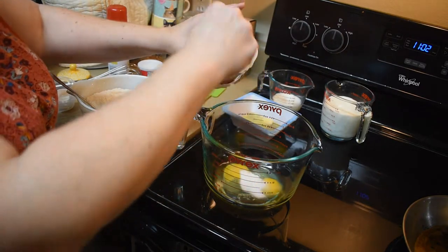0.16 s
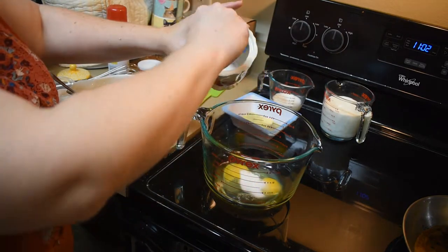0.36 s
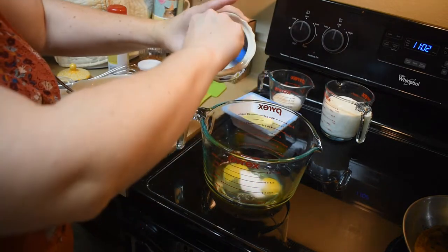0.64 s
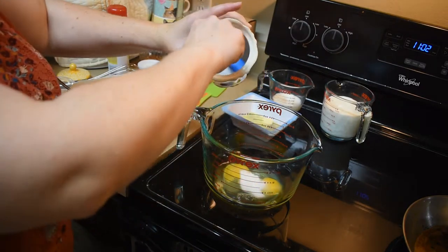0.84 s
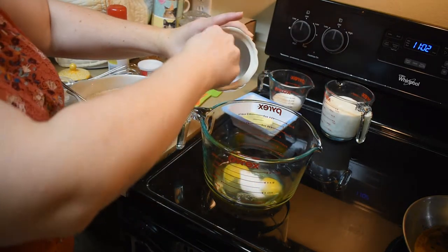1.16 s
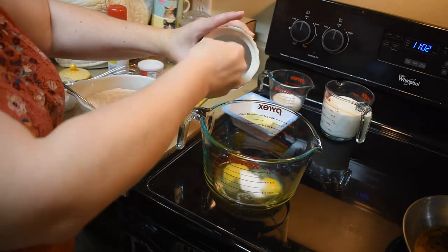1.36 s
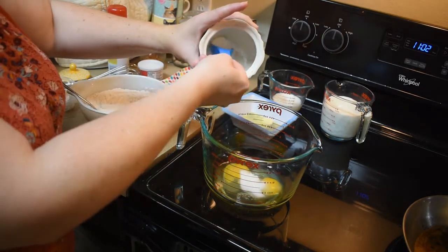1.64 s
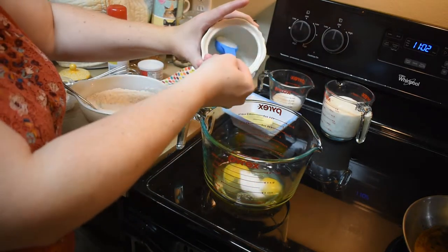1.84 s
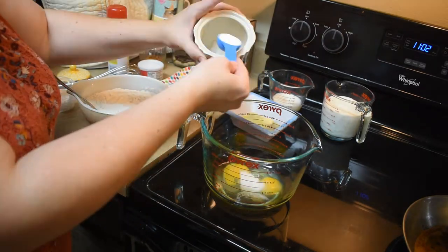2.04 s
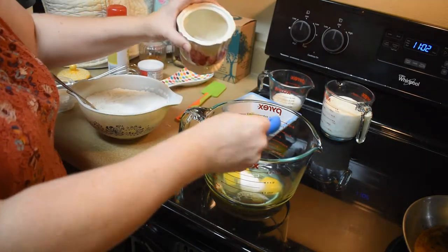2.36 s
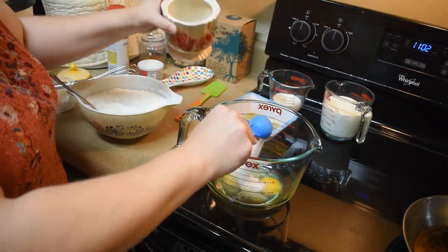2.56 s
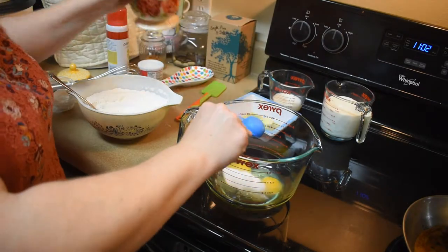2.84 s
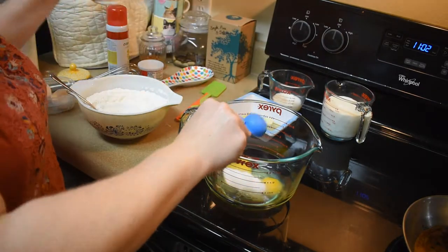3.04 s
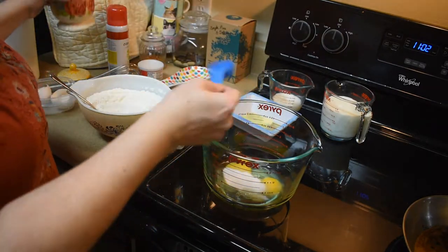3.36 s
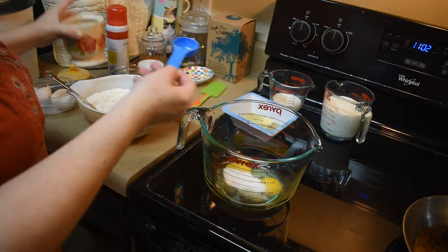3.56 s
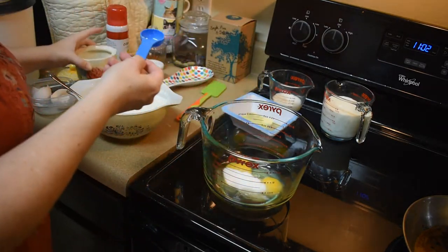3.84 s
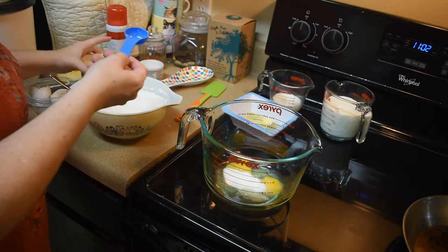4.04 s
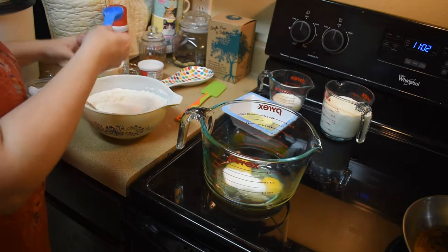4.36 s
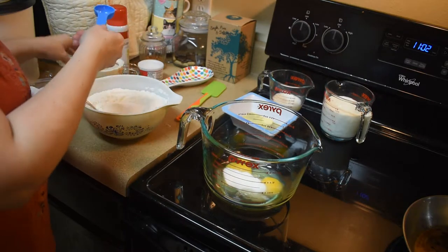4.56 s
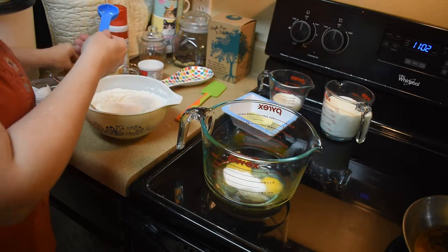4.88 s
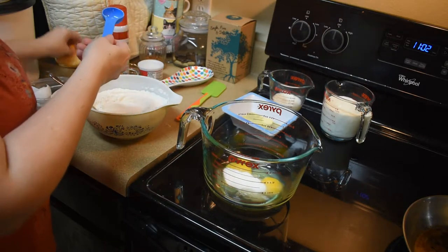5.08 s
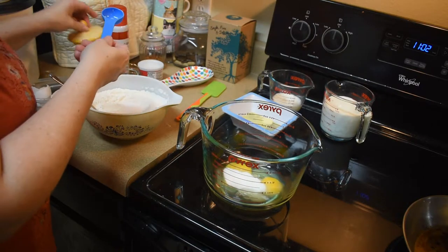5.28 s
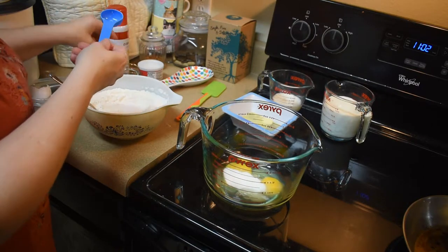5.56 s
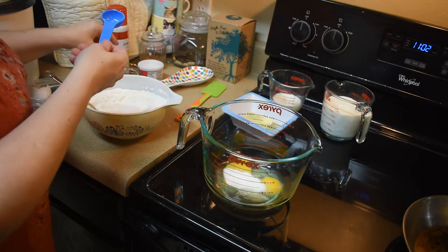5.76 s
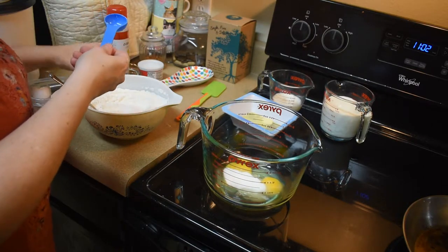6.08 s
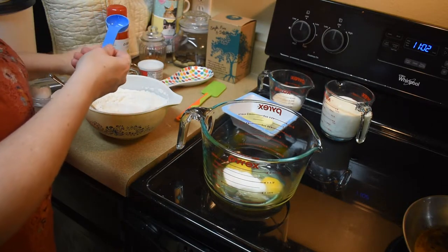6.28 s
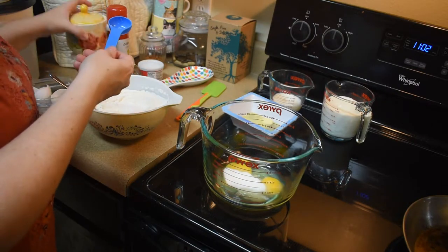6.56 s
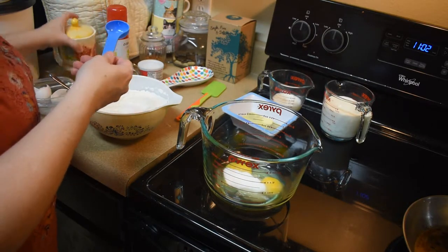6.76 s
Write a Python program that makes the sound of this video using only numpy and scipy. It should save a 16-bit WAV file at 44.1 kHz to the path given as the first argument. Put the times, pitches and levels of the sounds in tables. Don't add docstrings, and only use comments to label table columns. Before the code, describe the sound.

Over a low refrigerator hum, a gritty scoop of crackling sugar rings a small ceramic jar, followed by a counter knock and soft lid clinks.

```python
import sys
import numpy as np
from scipy import signal
from scipy.fft import rfft, irfft, next_fast_len
from scipy.io import wavfile
from scipy.ndimage import uniform_filter1d

SR = 44100
rng = np.random.default_rng(int(sys.argv[2]) if len(sys.argv) > 2 else 0)


def generate_wav(signal):
    frames = np.transpose(np.atleast_2d(signal))
    scaled = np.clip(frames, -1, 1) * 32767
    pcm = np.round(scaled).astype(np.int16)
    wavfile.write(sys.argv[1], SR, pcm)


def nominal_scale(level):
    x = np.asarray(level, float) / 20
    return 10 ** x


N = 305172

# t/s, grind level/dB
FEELING_ABOUT = [
    (.36, -63),
    (.42, -52),
    (.53, -75),
    (.64, -60),
    (.74, -69),
    (.82, -50.5),
    (.9, -60),
    (.99, -42),
]
DEEP_SCOOP = [
    (1.048, -36),
    (1.058, -27.5),
    (1.115, -36.5),
    (1.15, -23),
    (1.2, -37.5),
    (1.245, -25.5),
    (1.275, -31.5),
    (1.35, -31.5),
    (1.435, -46),
]
DRAG_UP = [
    (1.49, -45.5),
    (1.545, -37),
    (1.62, -70),
    (1.72, -56),
    (1.9, -70),
]

# t/s, peak level/dB, drive of the lower wall/dB, favoured f/Hz
SPOON_TAPS = [(0.3639, -30.5, 7.5, 3600), (0.4075, -40, -5, 5800), (0.4634, -49, 9, 3850),
              (0.532, -42, 8, 6660), (0.5437, -35.5, 2.5, 4460), (0.616, -40, 1, 4460),
              (0.635, -42, 5, 6620), (0.6448, -36, 4, 5360), (0.656, -44.5, 10, 4630),
              (0.6764, -39, 5.5, 5450), (0.695, -45, 6, 5800), (0.7761, -37, 6, 4400),
              (0.784, -30, -3.5, 5500), (0.8124, -33, -3, 6300), (0.873, -40, 2, 5800)]
CRYSTAL_CRACKS = [(0.9961, -4, -9.5, 6700), (1.0024, -7.5, -5.5, 6240), (1.0306, -9.5, -5, 6450),
                  (1.0424, -9, -7, 6590), (1.0525, -9.5, 1, 6540), (1.0574, -21, -4, 5440),
                  (1.0684, -14, -1, 4950), (1.0774, -9, -2, 5500), (1.0854, -9, -3.5, 5060),
                  (1.0964, -15, -8, 4960), (1.1094, -10, -15, 6410), (1.1248, -25, -5, 6900),
                  (1.1248, -1, -9, 5100), (1.1304, -18, -15, 5080), (1.1364, -14, -2, 5760),
                  (1.1404, -14, -9, 6430), (1.1444, -16, 3, 4880), (1.1574, -7.5, -8, 4970),
                  (1.1618, -4, -9, 5070), (1.1664, -13, -7, 6390), (1.1744, -23, -7, 6440),
                  (1.1854, -23, -7, 4900), (1.2092, -9, -6, 5260), (1.2144, -9.5, 2, 6190),
                  (1.2184, -11, 1, 4990), (1.2284, -4, -10, 4920), (1.2374, -9.5, -13, 4900),
                  (1.2444, -13, -10, 6610), (1.2574, -21, -14, 4830), (1.2624, -9, -6, 4910),
                  (1.2684, -14, -5, 5140), (1.281, -3.5, -5.5, 4940), (1.2925, -7, -0.5, 5300),
                  (1.3044, -8, -1, 6260), (1.3129, -1.5, -15, 5310), (1.3164, -2.5, -11, 6710),
                  (1.3204, -4, -3, 6270), (1.3264, -8, -1, 6460), (1.3384, -12.5, -3, 5200),
                  (1.3424, -5, -0.5, 5050), (1.3484, -22, -7, 5560), (1.3554, -15, -1, 5270),
                  (1.3654, -17, 2, 6310), (1.3813, -7.5, -18, 4900)]
SPOON_KNOCKS = [(0.9174, -13.5, -11, 5600), (0.9371, -25, 1.5, 6230), (0.966, -28.5, 10, 6620),
                (1.4456, -12, -4.5, 5200), (1.4505, -19, 0, 5600), (1.4706, -14.5, -13, 4840),
                (1.476, -18, -5, 5000), (1.483, -23, -1, 4900), (1.5015, -26, -8, 4960),
                (1.5194, -15, -11, 6120), (1.5309, -11.5, -7, 5200), (1.537, -13, -4, 5300),
                (1.543, -19, -6, 6200), (1.5564, -21, -22, 6500), (1.565, -15, -6, 6300),
                (1.5713, -12, -19, 6350), (1.5853, -5.5, -8.5, 4930), (1.595, -28, -10, 5100),
                (1.6104, -17, -8, 5960), (1.63, -23, -8, 6300), (1.644, -24, -2.5, 6000),
                (1.6576, -19.5, -5, 5800), (1.672, -21.5, -8, 5460), (1.686, -28, -5, 6200),
                (1.7384, -16.5, -4.5, 4900), (1.8008, -17, -5, 4970)]
# t60/s, level/dB, favoured lower-wall f/Hz, extra brightness/dB
CRYSTAL_SPILLS = [
    (0.062, -29, 2500, 15.5),
    (0.036, -28.5, 3400, -5.5),
    (0.059, -28.5, 7400, -1),
]
# t/s, level/dB, favoured f/Hz
AIR_SHOVES = [(.362, -30, 740), (.385, -53, 740), (0.969, -32, 810), (1.031, -34, 818), (1.058, -28, 820),
              (1.076, -40, 820), (1.139, -53, 990), (1.166, -26, 830), (1.186, -41, 820), (1.214, -31, 810),
              (1.249, -25, 829), (1.262, -52, 986), (1.303, -27, 1010), (1.339, -48, 821),
              (1.361, -32, 826), (1.456, -45, 840), (1.532, -30, 820)]

# f/Hz, width/Hz, level/dB
UPPER_WALL = [(3950, 570, -2), (4160, 490, -2), (4630, 270, -7.5), (5060, 350, 5.5), (5300, 240, -0.5),
              (5970, 390, -5), (6070, 560, -2.5), (6290, 240, 4.5), (6680, 420, 2)]
LOWER_WALL = [(1120, 25, -10.5), (1332, 80, -6), (1700, 150, -9), (1770, 78, -10), (1998, 43, -2),
              (2035, 60, -8.5), (2194, 67, -2), (2350, 280, -12), (2830, 390, 1.5), (3000, 190, -13),
              (3120, 180, -6), (3500, 300, -3)]
JAR_AIR = [(600, 34, -19.5), (700, 54, -11), (802, 22, -2.5), (829, 30, 0.5), (986, 34, -3)]
# f/Hz, level/dB
GRIT_COLOUR = [(500, -52), (2500, -11), (4200, -7), (5000, 12), (6600, -6), (7400, -28), (10000, -45)]
FIZZ_COLOUR = [(5000, -39), (7000, -6.5), (8200, -6), (9700, -3.5), (11500, -8.5), (13000, -11.5),
               (15500, -26), (17000, -11)]

# t/s, level/dB, lowest f/Hz, highest f/Hz, t60/s
CONTACT_TICKS = [(0.128, -55.5, 1800, 2600, 0.16), (.13, -64, 6000, 7200, .2), (2.82, -68, 4500, 7000, 0.092),
                 (3.854, -59, 5000, 7100, .1), (3.909, -54, 4500, 6800, 0.1), (3.912, -72, 8000, 12000, .1),
                 (3.926, -64, 2500, 6500, 0.11), (4.011, -44, 1080, 6300, 0.19),
                 (4.013, -74, 7000, 13000, .15), (4.185, -37, 910, 2570, 0.069),
                 (4.186, -48.5, 2500, 5500, .08), (4.2, -40, 800, 1500, .15), (3.912, -53, 1200, 2800, .1),
                 (4.186, -65, 5500, 11500, 0.1), (4.261, -50, 2500, 7500, 0.087),
                 (4.288, -61, 6500, 8800, .08), (.363, -29.5, 2180, 4700, 0.041), (3.3, -61, 1500, 4000, 1),
                 (5.759, -51, 1200, 6500, 0.15), (5.842, -43.5, 990, 2650, 0.21),
                      (5.845, -53.5, 3000, 6170, 0.39), (6.222, -45.5, 2000, 6350, 0.24),
                      (6.225, -56, 6500, 12800, .08), (6.419, -48, 2530, 6900, 0.13),
                      (6.418, -53, 7000, 15000, .08), (6.423, -42, 1000, 3200, 0.16),
                      (6.454, -54, 2520, 7000, 0.088), (6.588, -50.5, 1500, 6660, 0.25),
                      (6.591, -43.5, 885, 1480, 0.17), (6.693, -53, 910, 1160, 0.33),
                      (6.801, -52, 1310, 1700, 0.14), (6.845, -58, 1980, 3500, 0.11)]
# t/s, peak level/dB, t60 factor, boom level/dB, favoured f/Hz
COUNTER_BLOWS = [(4.183, -13, 0.72, 0.5, 700), (4.187, -15, 0.8, -12, 640), (4.192, -15, 0.57, -20, 920),
                 (4.196, -13.5, 0.3, -20, 645), (4.203, -16.5, .6, -19, 840), (4.217, -28, 0.65, -6, 650),
                 (4.236, -33, 0.76, -5, 600), (4.259, -25, 0.57, 2, 500), (5.759, -28.5, 0.79, -3, 420),
                 (5.772, -28, 2, -2, 420), (5.843, -24.5, 1, 1.5, 1290), (5.848, -28, 0.9, -13, 372),
                 (5.861, -26.5, 0.7, -11, 880), (6.269, -35, 0.99, 7, 1150)]
# t/s, peak level/dB
CERAMIC_CLINKS = [(3.908, -45.5), (3.925, -49), (4.011, -41), (4.186, -74), (5.76, -41), (5.777, -43),
                  (6.223, -24), (6.416, -26.5), (6.426, -28), (6.442, -24), (6.456, -36.5), (6.593, -45),
                  (0.363, -40), (5.758, -27.5), (5.771, -25), (6.453, -27.5)]

# f/Hz, level/dB, t60/s
CABINET_BOOM = [(113, -17, 0.26), (134.3, -7, 0.067)]
COUNTER_TOP = [(270, -13, 0.18), (355.8, 7, 0.38), (394, -3, 0.082), (454, -3, 0.13), (502, -2.5, 0.11),
               (576, 5.5, 0.077), (663, 7, 0.11), (800, -1, 0.1), (970, -0.5, 0.05), (1098, 3, 0.07),
               (1340, -1, 0.081), (1580, -1, 0.055), (1770, -2, 0.068), (2130, -2, 0.026)]
SPOON_TOUCH = [(2160, -4, 0.056), (2670, 2, 0.35), (3400, -33, 0.11), (4440, -17, 0.18), (5770, 2, .2)]
HAND_BRUSH = [(5100, -6, .08), (5600, 3, 0.088), (6600, -3, .07), (11100, -14, .08)]
FINGER_GRIP = [(2690, -1, 0.13), (3600, 0, 0.18), (4200, -7, .12), (5950, -1, .06)]
SLIDING_JAR = [(1200, -2, .08), (1800, 4, .08), (2510, -9, .1), (3880, -3, .09), (4630, -9, .12),
               (5840, -2, .1), (6500, -1, .06), (10500, -19, .06)]
FOOT_OF_JAR = [(10600, -1, .12), (11400, -9, .05)]
LIFTED_LID = [(2440, -2, 0.08), (2150, -2, .06), (5800, -4, 0.13), (8860, -11, 0.18), (10000, -20, .15)]
ROCKING_LID = [(2420, -3, 0.11), (5450, 4, 0.1), (6000, -6, .1)]
KNOCKED_LID = [(440, -6, 0.12), (492, 2.5, 0.094), (800, -10.5, .1), (986, -14.5, .1), (1580, -14, 0.035),
               (2080, -22, 0.052)]
TOUCHING_LID = [(1570, -16, 0.13), (2350, 15, 0.028), (2470, -6.5, 0.063), (2460, -12, 0.29),
                (2800, -10, 0.16), (3920, -8, 0.18), (4700, -4, 0.16), (4910, -10, 0.11), (5200, -5, 0.12),
                (5800, -10, 0.15), (5755, 3, 0.092), (7860, -25, .15), (10100, -10, 0.098),
                (11920, -22, .15)]
SEATED_LID = [(2910, -13, 0.29), (4100, -12, 0.18), (4900, -8, 0.15), (5230, 1, 0.064), (5600, 1, 0.057),
              (6170, 6, 0.052), (6546, -5, 0.092), (7154, -22, 0.11), (8280, -12, .05), (10080, -9, 0.07),
              (10400, -13, 0.1), (11040, -7, 0.091), (12960, -24, .06)]
RINGING_JAR = [(680, -5, .08), (713, -3, 0.1), (826, -2, 0.22), (966, 8, 0.13), (1093, -8, 1),
               (1226, -2, 0.066), (1470, -8, 0.15), (1483, -6.5, 0.11), (1690, 3, 0.05), (1771, -8, 0.1),
               (2060, -6.5, .06), (2480, -21, .08)]
BOUNCING_LID = [(2610, -14, .18), (2790, -8, 0.21), (2800, -13, 0.092), (3553, -17, .15), (4250, -2, 0.11),
                (5249, -6, .11), (5730, 7, 0.054), (6300, -12, .1), (7350, -14, .07)]
SETTLING_LID = [(5600, 8, 0.073), (6500, 7, 0.05), (7300, -6, .05), (8800, -4, .05), (9800, -8, .05),
                (11900, -12, .05)]

# f/Hz, t60/s
ROOM_DECAY = [(200, 0.19), (800, 0.41), (3000, 0.36), (8000, 0.28), (15000, 0.044)]
# f/Hz, level/dB
COMPRESSOR = [(296.1, -55), (355.3, -41), (414.5, -51), (624.5, -65), (651.4, -64), (710.6, -60),
              (882.9, -66), (1007, -69), (1184, -65), (1362, -72), (1836, -77), (2842, -78), (2961, -81),
              (3198, -76), (3435, -74), (3494, -77), (3731, -79), (3849, -77), (3908, -78), (4382, -82),
              (5626, -69), (5744, -82), (5803, -67), (5862, -78), (6158, -85), (6928, -86)]
# f/Hz, level per Hz/dB
HISS_COLOUR = [(15, -60), (30, -18), (97, -18.5), (180, -13), (265, -2), (330, -13), (476, -12),
               (1100, -21), (2160, -32.5), (4870, -37), (6200, -36.5), (7400, -48), (11000, -50.5),
               (16000, -60)]


def evened(x):
    return x / np.sqrt(np.mean(x ** 2) + 1e-20)


def read(points, hz):
    f, value = np.transpose(points)
    return np.interp(np.log(hz + 1), np.log(f + 1), value)


def add(mix, s, sound):
    part = mix[round(s * SR):][:len(sound)]
    part += sound[:len(part)]


def colour(points):
    db = read(points, abs(np.fft.fftfreq(4096, 1 / SR)))
    log_gain = np.log(nominal_scale(np.maximum(db, -70)))
    taps = np.fft.ifft(np.exp(np.conj(signal.hilbert(log_gain)))).real[:1024]
    return taps / np.linalg.norm(taps)


def modes(table, stretch=1, spread=0.00045, size=SR // 3):
    hz, db, t60 = np.transpose(table)[:, :, None]
    sign, detune = rng.standard_normal((len(table), 2, 1)).transpose(1, 0, 2)
    turn = 2j * np.pi * hz * (1 + spread * detune)
    fade = np.log(1000) / (t60 * stretch)
    step = np.exp((turn - fade) / SR)
    spirals = np.cumprod(np.repeat(step, size, axis=1), axis=1)
    x = (np.sign(sign) * nominal_scale(db) * spirals).sum(0).imag
    return x / abs(x).max()


def body(peaks, uneven_db=0, centre_hz=None, narrow_db=30):
    hz, width, db = np.transpose(peaks)
    db = db + 10 * np.log10(width) + uneven_db * rng.standard_normal(len(hz))
    if centre_hz is not None:
        db = db - narrow_db * np.log2(hz / centre_hz) ** 2
    x = modes(np.transpose([hz, db, 1.92 / width]), spread=0.0057, size=4000)
    return x / np.linalg.norm(x)


def grit_ring():
    return np.pad(colour(GRIT_COLOUR), (0, 4000 - 1024))


def grinding():
    s, pressure_db = np.transpose(FEELING_ABOUT + DEEP_SCOOP + DRAG_UP)
    t = np.arange(N) / SR
    clumps = evened(uniform_filter1d(rng.standard_normal(N), size=120))
    size_db = 4.1 * np.minimum(rng.exponential(1, N), 4) + 2.4 * np.clip(clumps, -2, 2)
    happens = rng.random(N) < 7000 / SR
    slips = evened(nominal_scale(size_db) * rng.choice([-1, 1], N) * happens)
    slips = slips * (t > s[0]) * (t < s[-1])
    grind_db = np.interp(t, s, pressure_db)
    over_db = grind_db + 30
    upper = slips * nominal_scale(grind_db)
    high = slips * nominal_scale(-37 + 1.0 * over_db)
    air = slips * nominal_scale(-34 + 0.93 * over_db)
    deep = slips * nominal_scale(-29 + 0.92 * over_db)
    out, grit = np.zeros(N), grit_ring()
    place = np.floor(np.cumsum(rng.random(N) < 60 / SR)) % 4
    for k in range(4):
        here = place == k
        wall = 0.84 * body(UPPER_WALL, uneven_db=2.5) + 0.5 * grit
        out += signal.oaconvolve(upper * here, wall)[:N]
        out += signal.oaconvolve(deep * here, body(LOWER_WALL, uneven_db=1.0))[:N]
        out += signal.oaconvolve(air * here, body(JAR_AIR, uneven_db=3.5))[:N]
    return out + signal.oaconvolve(high, colour(FIZZ_COLOUR))[:N]


def snaps():
    out, high, grit = np.zeros(N), np.zeros(N), grit_ring()
    t = np.arange(3000) / SR
    snap_shape = nominal_scale(-60 * t / 0.0083) * np.minimum(t / 0.00081, 1)
    for table, spill in zip((SPOON_TAPS, CRYSTAL_CRACKS, SPOON_KNOCKS), CRYSTAL_SPILLS):
        spill_s, spill_db, deep_hz, bright_db = spill
        for at, db, deep_db, hz in table:
            t60 = spill_s * np.exp(0.12 * rng.standard_normal())
            burst = rng.standard_normal(3000) ** 3 * nominal_scale(spill_db - 60 * t / t60)
            burst += 0.4 * np.sign(rng.standard_normal(3000)) * snap_shape
            burst[20] = 0.31
            burst = burst * nominal_scale(db - 1.5)
            ring = 1.57 * body(UPPER_WALL, 3.2, hz) + 0.059 * grit
            ring += nominal_scale(deep_db + 6.0) * body(LOWER_WALL, 1.5, deep_hz, narrow_db=3.0)
            add(out, at, signal.fftconvolve(burst, ring))
            add(high, at, burst * nominal_scale(-11 + 0.35 * db + bright_db + 9.0))
            air = body(JAR_AIR, uneven_db=-0.5)
            add(out, at, signal.fftconvolve(burst * nominal_scale(deep_db - 2), air))
    return out + signal.oaconvolve(high, colour(FIZZ_COLOUR))[:N]


def shoves():
    out, t = np.zeros(N), np.arange(1500) / SR
    for s, db, centre_hz in AIR_SHOVES:
        push = rng.standard_normal(len(t)) * nominal_scale(db - 60 * t / 0.045)
        air = body(JAR_AIR, 1.5, centre_hz, narrow_db=120)
        add(out, s, signal.fftconvolve(push, air))
    return out


def thuds():
    out, t = np.zeros(N), np.arange(SR // 3) / SR
    for s, db, stretch, boom_db, centre_hz in COUNTER_BLOWS:
        woken = [(hz, level_db - 7 * np.log2(hz / centre_hz) ** 2, t60)
                 for hz, level_db, t60 in COUNTER_TOP]
        knock = modes(5 * woken, stretch, spread=0.032, size=9000)
        knock = knock * np.minimum(t[:9000] / 0.0013, 1)
        boom = modes(CABINET_BOOM, size=len(t)) * np.minimum(t / 0.0063, 1)
        add(out, s, nominal_scale(db) * knock)
        add(out, s, nominal_scale(db + boom_db - 10.5) * boom)
    return out


def clinks():
    out, t = np.zeros(N), np.arange(SR // 3) / SR
    struck = (HAND_BRUSH, FINGER_GRIP, SLIDING_JAR, FOOT_OF_JAR, LIFTED_LID, ROCKING_LID,
              TOUCHING_LID, SEATED_LID, RINGING_JAR, RINGING_JAR, BOUNCING_LID, SETTLING_LID,
              SPOON_TOUCH, KNOCKED_LID, KNOCKED_LID, RINGING_JAR)
    rise = np.minimum(t / 0.0014, 1)
    for (s, db), table in zip(CERAMIC_CLINKS, struck):
        neighbours = [(hz, level_db, t60 * 0.35) for hz, level_db, t60 in table]
        ring = 1.44 * modes(table) + 1.06 * modes(3 * neighbours, spread=0.022)
        add(out, s, nominal_scale(db) * rise * ring)
    return out


def ticks():
    out, t = np.zeros(N), np.arange(SR // 4) / SR
    for s, db, low_hz, high_hz, t60 in CONTACT_TICKS:
        shade = colour([(low_hz / 4, -50), (low_hz / 1.3, -10), (low_hz, 0),
                        (high_hz, -3), (high_hz * 1.1, -13), (high_hz * 3, -50)])
        snap, rustle = nominal_scale(-60 * t / 0.0053), nominal_scale(0.5 - 60 * t / t60)
        puff = rng.standard_normal(len(t)) * (snap + rustle)
        add(out, s, nominal_scale(db) * np.convolve(puff, shade))
    return out


def kitchen(x):
    taps = np.zeros(SR // 2)
    at = np.arange(200, len(taps) - 20, 20)
    taps[at + rng.integers(0, 20, len(at))] = rng.choice([-1., 1.], len(at))
    hz, t, z = signal.stft(taps, SR, nperseg=256)
    fade = nominal_scale(-60 * t / read(ROOM_DECAY, hz)[:, None])
    tail = signal.istft(z * fade, SR, nperseg=256)[1]
    return signal.fftconvolve(x, tail / np.linalg.norm(tail))[:N]


def drift(rate_hz):
    t = np.arange(N // 64 + 1) * 64 / SR
    x = sum(np.sin(2 * np.pi * (f * t + rng.random())) / np.sqrt(f)
            for f in np.geomspace(rate_hz / 20, rate_hz, 12))
    return np.interp(np.arange(N) / SR, t, evened(x))


def fridge():
    turns = np.cumsum(1 + 0.00026 * drift(2.93)) / SR
    starts = np.append([.45, 0, 0], rng.random(len(COMPRESSOR) - 3))
    tone = np.zeros(N)
    for (hz, db), start in zip(COMPRESSOR, starts):
        waver_db = (1.08 + 2.5 * hz / 6000) * drift(8) + 1.5 * hz / 6000 * drift(30)
        tone += np.sqrt(2) * nominal_scale(db + waver_db) * np.sin(2 * np.pi * (hz * turns + start))
    size = next_fast_len(N)
    shade = nominal_scale(read(HISS_COLOUR, np.fft.rfftfreq(size, 1 / SR)))
    hiss = irfft(rfft(rng.standard_normal(size)) * shade, size)[:N]
    return nominal_scale(-0.37) * tone + nominal_scale(-45 + 0.35 * drift(12.0)) * evened(hiss)


def scene():
    no_bass = signal.butter(2, 450, "high", fs=SR, output="sos")
    near = signal.sosfilt(no_bass, grinding() + snaps() + shoves())
    far = ticks() + thuds() + clinks()
    echo = kitchen(nominal_scale(-10.5) * near + nominal_scale(-8.5) * far)
    return (near + far + echo + fridge())[None]


def top_cut(x):
    return signal.sosfilt(signal.butter(12, 16430, fs=SR, output="sos"), x)


def record(dry):
    thin = signal.sosfilt(signal.butter(2, 60, "high", fs=SR, output="sos"), dry)
    soft = 0.7 * np.tanh(thin / 0.7)
    edge = signal.firwin(255, 15900, window=("kaiser", 8), fs=SR)
    mix = signal.oaconvolve(soft, edge[None], "same")
    return top_cut(mix)


dry = scene()
out = record(dry)
generate_wav(out)
```